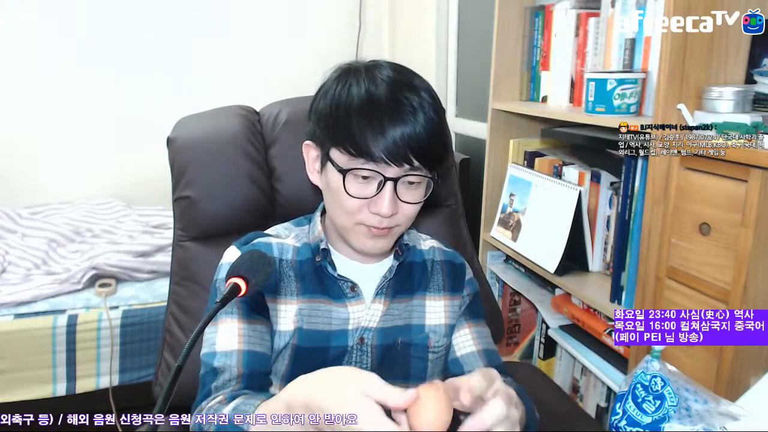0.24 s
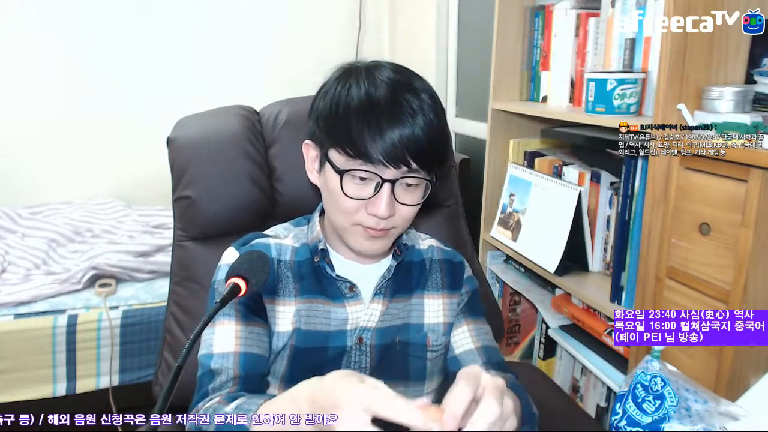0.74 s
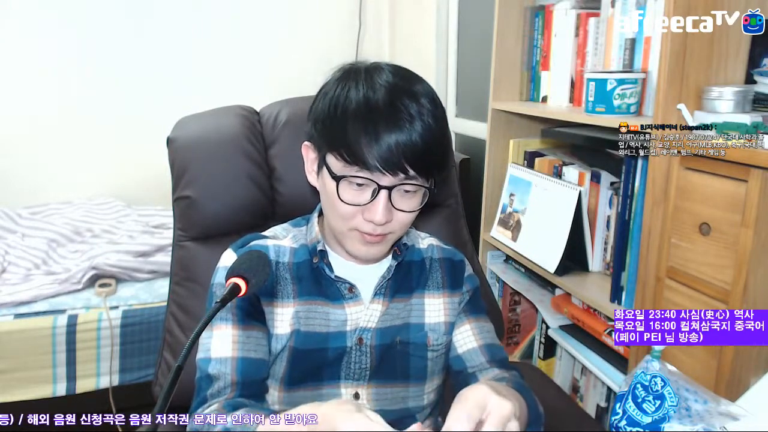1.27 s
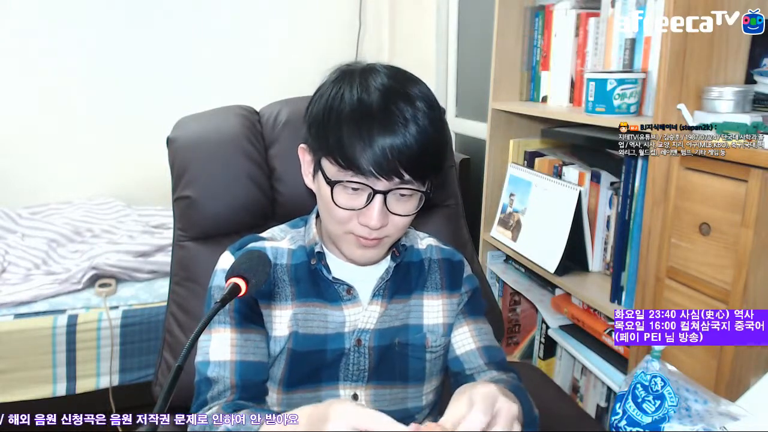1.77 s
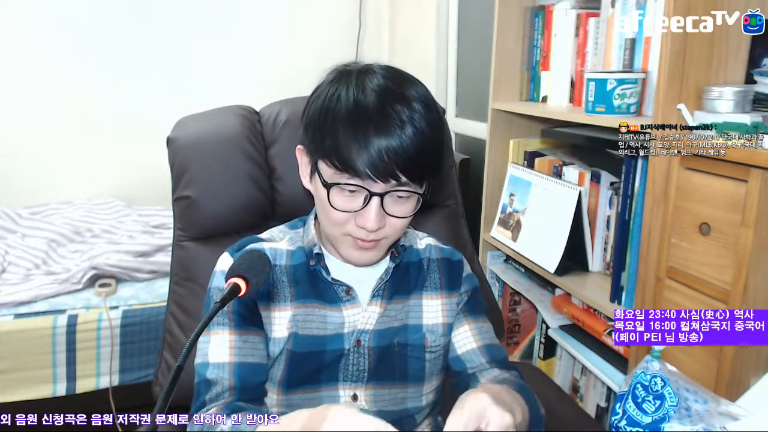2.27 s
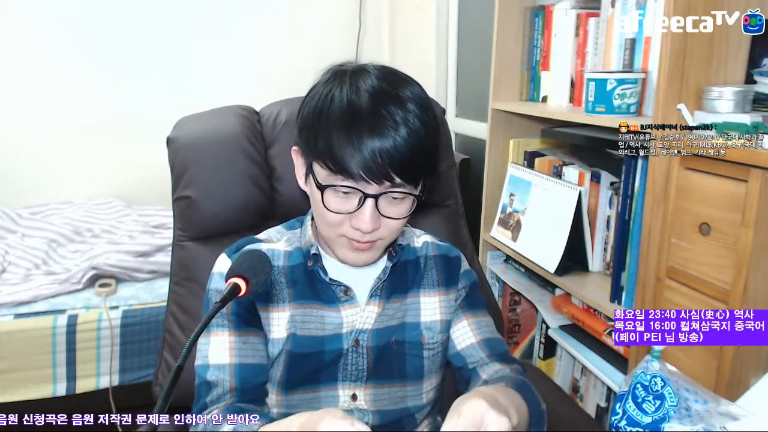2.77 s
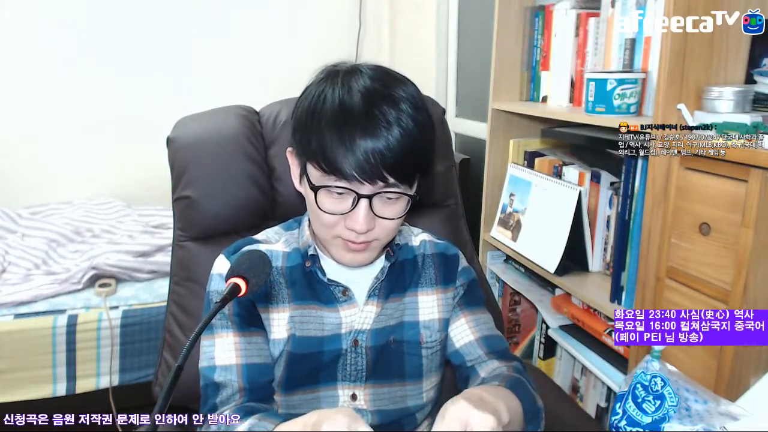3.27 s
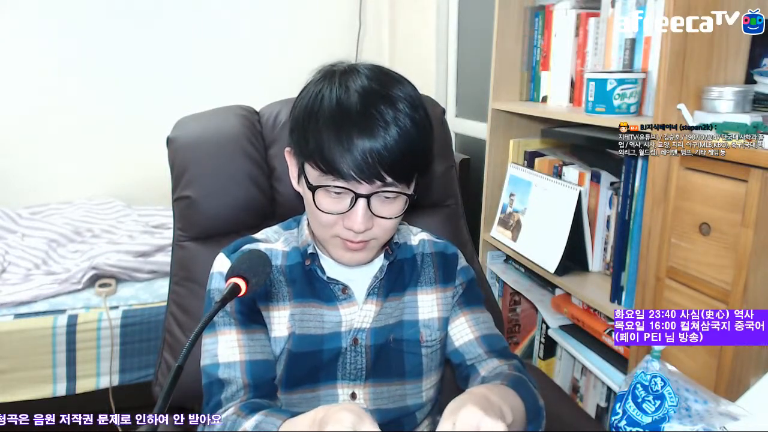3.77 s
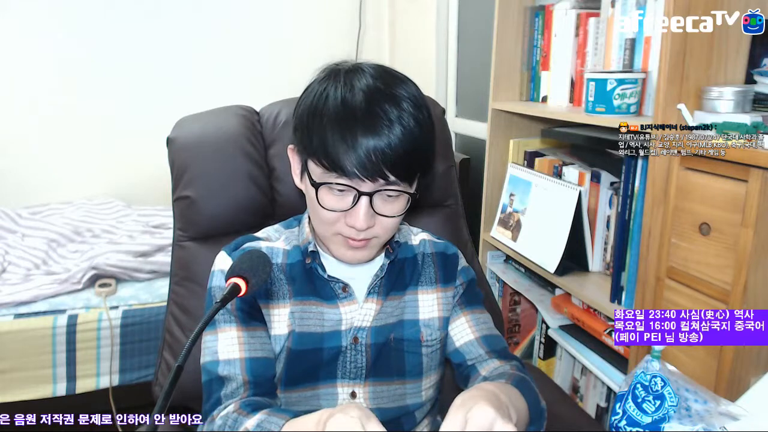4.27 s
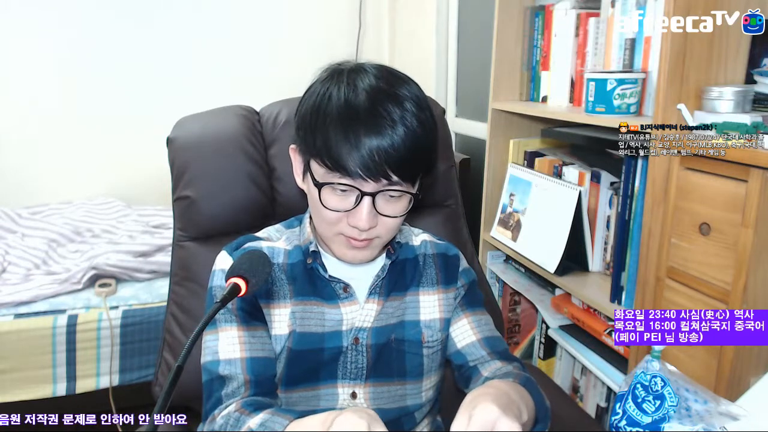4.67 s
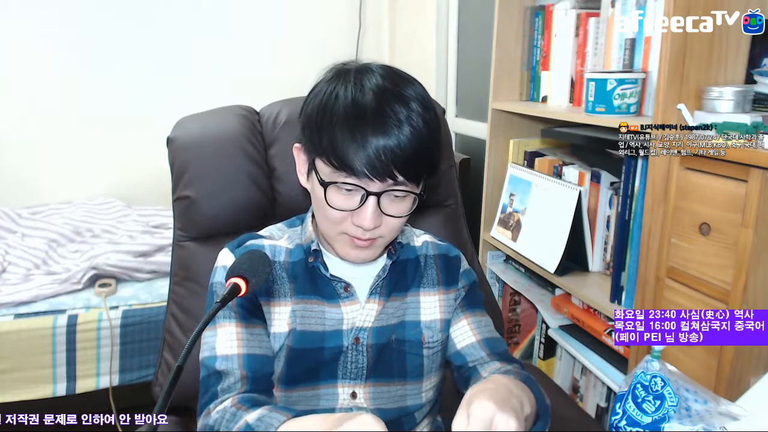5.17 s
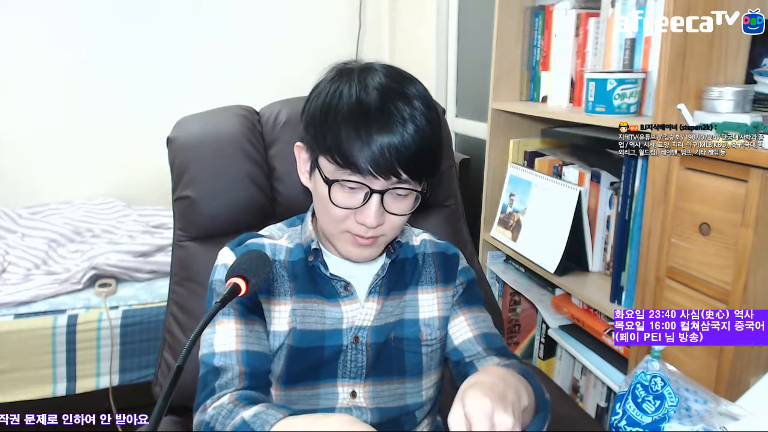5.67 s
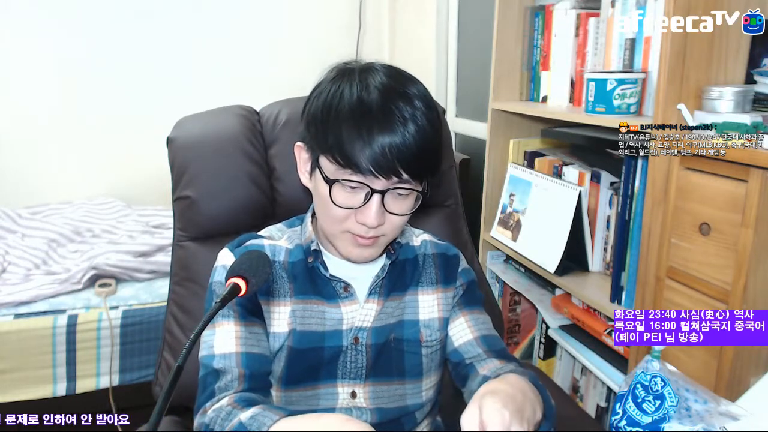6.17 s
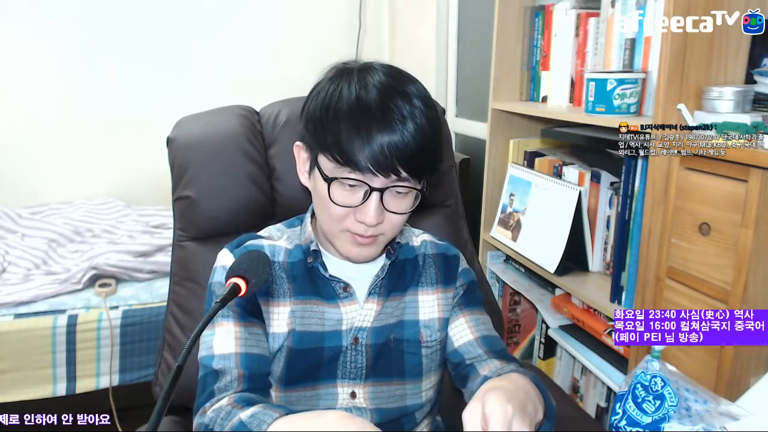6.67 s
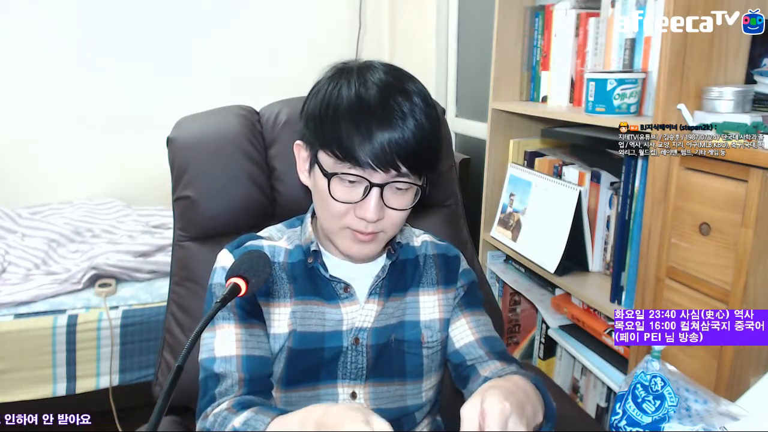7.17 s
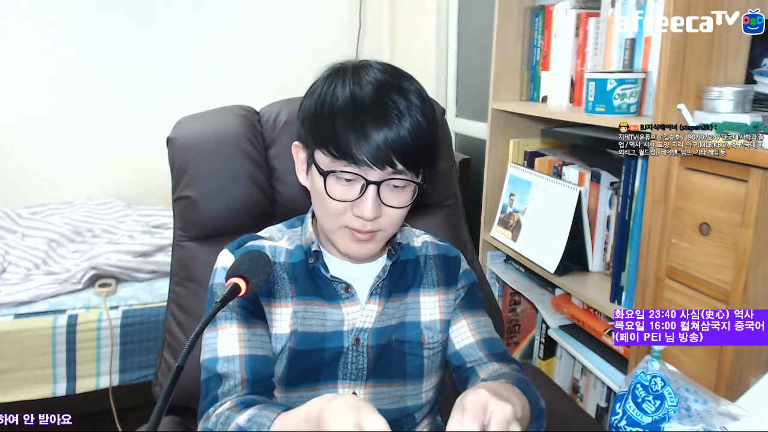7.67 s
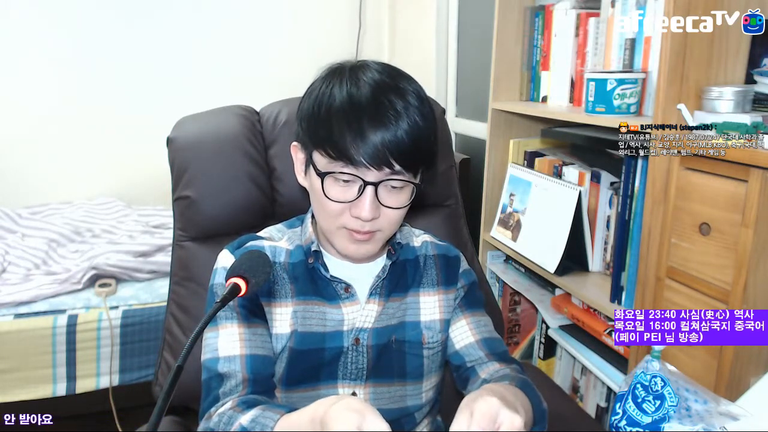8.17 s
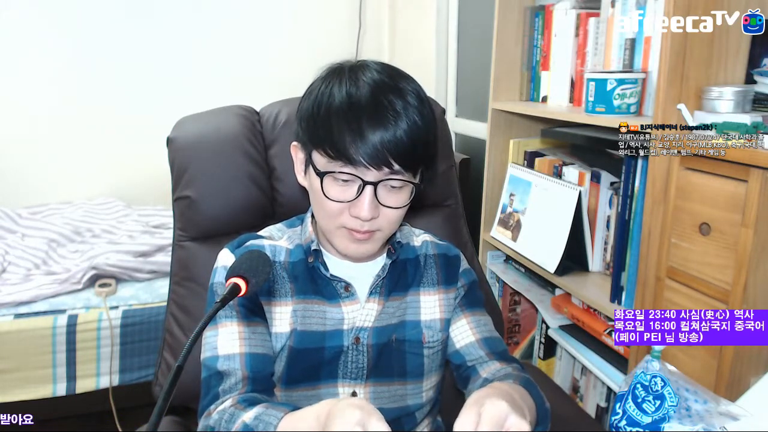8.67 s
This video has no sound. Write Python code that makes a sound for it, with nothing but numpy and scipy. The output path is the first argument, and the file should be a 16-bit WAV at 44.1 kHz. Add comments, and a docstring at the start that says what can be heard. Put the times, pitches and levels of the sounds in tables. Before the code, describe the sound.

Quiet cracking and peeling of a cooked egg, with bits of shell clinking into a dish in a small, humming room.

```python
"""At a desk in a small, quiet room, a roasted egg is cracked and peeled by hand.
The shell crackles and snaps under the thumbs, coloured by the cupped hands, and once caves in with a pop.
Flakes tick and skitter into a ringing dish, and late on the membrane tears away in short, falling rips.
Mains hum, a computer fan, rumble, hiss and a thin electronic whine lie under it all."""
import sys
import numpy as np
from scipy import signal
from scipy.fft import rfft, irfft, next_fast_len
from scipy.io import wavfile
from scipy.ndimage import map_coordinates

SR = 44100
rng = np.random.default_rng(int(sys.argv[2]) if len(sys.argv) > 2 else 0)


def wav_out(sig):
    """Save sig, one row per channel (or a flat mono array), as 16-bit PCM at SR to the path in sys.argv[1]."""
    wavfile.write(sys.argv[1], SR, np.round(np.clip(np.atleast_2d(sig).T, -1, 1) * 32767).astype(np.int16))


N = 393372


def amp(db):
    """Decibels to gain."""
    return 10 ** (np.asarray(db) / 20)


def unit(x):
    """Scale to rms 1."""
    return x / np.sqrt(np.mean(x ** 2) + 1e-20)


def along(points, hz):
    """Read a curve of (frequency, value) points on a log frequency axis."""
    f, v = np.transpose(points)
    return np.interp(np.log(hz + 1), np.log(f), v)


def add(track, s, sound):
    """Mix a sound into a track at s seconds."""
    slot = track[max(0, round(s * SR)):][:len(sound)]
    slot += sound[:len(slot)]


def coloured(x, gain_db, size=1024):
    """Minimum-phase EQ with the curve gain_db(f): nothing rings ahead of an attack."""
    cepstrum = irfft(np.log(amp(gain_db(np.fft.rfftfreq(size, 1 / SR))) + 1e-6))
    cepstrum[1:size // 2] *= 2
    cepstrum[size // 2 + 1:] = 0
    impulse = irfft(np.exp(rfft(cepstrum)))
    return signal.fftconvolve(x, impulse)[:len(x)]


def noise(spectrum):
    """Steady noise of rms 1 with the given spectral shape."""
    size = next_fast_len(N)
    gain = amp(along(spectrum, np.fft.rfftfreq(size, 1 / SR)))
    return unit(irfft(rfft(rng.standard_normal(size)) * gain, size)[:N])


def wobble(rate):
    """A smooth random curve, rate knots a second."""
    knots = rng.standard_normal(int(N * rate / SR) + 4)
    return map_coordinates(knots, [np.arange(N) * rate / SR])


def background(mains_hz=60, waver_db=0.2, drift_rad=0.15, rumble_db=-56, air_db=-64, hiss_db=-67.5):
    """The bed: slightly unsteady mains hum and computer fan tones over room rumble, air and hiss."""
    # mains hum: harmonic number, rms level/dB
    harmonics = [(1, -30), (2, -64), (3, -79), (4, -79.5), (5, -74.5), (7, -71), (8, -82.5), (9, -79.5),
                 (11, -72), (13, -77), (15, -82.5)]
    # tones of the computer: f/Hz, rms level/dB
    fan_tones = [(368, -66), (3848, -82), (11434, -94)]
    # spectra of the low, middle and high room noise: f/Hz, relative level/dB
    rumble = [(15, -13), (30, -8.5), (50, 2.5), (85, -0.5), (110, -11), (160, -50), (300, -42.5)]
    air = [(80, 11.5), (150, 5), (350, 3.5), (600, 1), (900, -0.5), (1300, -4), (2500, -18.5)]
    hiss = [(560, -37), (950, -4.5), (2310, -3), (3600, -7.5), (4000, -5), (4190, -7.5), (9060, -12),
            (9830, -11), (15500, -15)]
    t = np.arange(N) / SR
    tone = lambda hz, db, phase: np.sqrt(2) * amp(db) * np.sin(2 * np.pi * (hz * t + rng.random()) + phase)
    hum = amp(waver_db * wobble(11)) * sum(tone(k * mains_hz, db, 0) for k, db in harmonics)
    lowest_hz = fan_tones[0][0]
    fan = sum(tone(hz, db, drift_rad * np.sqrt(hz / lowest_hz) * wobble(3.1)) for hz, db in fan_tones)
    wash = amp(rumble_db) * noise(rumble) + amp(air_db) * noise(air) + amp(hiss_db) * noise(hiss)
    return hum + fan + wash


def whine(hz=10010, drift_rad=1.8):
    """A thin, wavering electronic tone that swells and recedes."""
    # fader ride of the whine: t/s, rms level/dB
    ride = [(0, -92), (4.6, -85), (5.2, -81), (6.4, -86), (7.3, -85), (8, -88)]
    t = np.arange(N) / SR
    gain = np.sqrt(2) * amp(np.interp(t, *np.transpose(ride)))
    return gain * np.sin(2 * np.pi * hz * t + drift_rad * wobble(40))


def looseness(s):
    """Firm shell breaks in broad, splintery cracks; loose flakes click more narrowly."""
    # state of the shell: t/s, nominal bandwidth/octaves, splintering t60/s
    loosening = [(1, .66, 0.015), (2.1, 0.62, 0.014), (3.05, 0.93, 0.021), (3.85, .42, 0.018),
                 (4.8, 0.6, 0.021), (5.05, 0.3, 0.02), (7.5, 0.43, .008), (8.4, 0.39, 0.028)]
    times, octaves, t60 = np.transpose(loosening)
    return np.interp(s, times, octaves), np.interp(s, times, t60)


def grains(n, rate, scatter_db, rub):
    """n samples of tiny cracks of very uneven size, rate a second, over a soft rubbing."""
    sizes = amp(scatter_db * np.minimum(rng.exponential(size=n), 3))
    fires = rng.random(n) < rate / SR
    return fires * sizes * rng.choice([-1, 1], n) + rub * rng.standard_normal(n)


def shell(x, centre_hz, octaves, spread=1.09, shelf_hz=10400, shelf_db=-4, ripple_db=1.4, ripple_hz=600):
    """A patch of shell radiates one broad hump with small resonances, coloured by the cupped hands."""
    # resonances of the egg in the hands: f/Hz, width/Hz, boost/dB
    resonances = [(1420, 145, 9.5), (2070, 180, 8.5), (2820, 190, 4), (3820, 880, 2.5), (5600, 540, 1),
                  (9560, 2800, 4.5)]
    knots = rng.standard_normal(size=128)

    def gain_db(f):
        distance = np.log2((f + 1) / centre_hz) / (spread * octaves)
        hump = -5 / np.log(10) * distance ** 2 - 10 * np.log10(1 + f / centre_hz)
        hollow = sum(db * np.exp(-((f - hz) / width) ** 2) for hz, width, db in resonances)
        ripple = ripple_db * map_coordinates(knots, [f / ripple_hz], mode="mirror")
        soft_top = shelf_db / (1 + (shelf_hz / (f + 1)) ** 20)
        return hump + hollow + ripple + soft_top

    return coloured(x, gain_db)


def crackle(rate=380, crowding=0.78, trim_db=-2, broader=1.24):
    """Under each thumb stroke tiny cracks run through the shell while the membrane rubs."""
    # strokes that crush or peel: start t/s, end t/s, level/dB before trim, centre f/Hz
    strokes = [(0.273, 0.31, -66, 8100), (0.656, 0.692, -65, 7000), (1.113, 1.149, -58.5, 6300),
               (1.164, 1.179, -46.5, 6550), (1.192, 1.21, -42.5, 6200), (1.298, 1.436, -64, 4600),
               (1.769, 1.808, -64, 4500), (1.891, 1.927, -60.5, 9000), (1.98, 2.12, -68, 6000),
               (2.198, 2.306, -62, 7200), (2.413, 2.473, -65.5, 6000), (2.961, 3.085, -61.5, 5000),
               (3.107, 3.27, -61.5, 6000), (3.305, 3.392, -60.5, 5400), (3.412, 3.462, -60, 4700),
               (3.782, 3.852, -64, 6960), (3.915, 4.004, -63, 4860), (4.112, 4.193, -60, 5900),
               (4.191, 4.252, -57.5, 6500), (4.251, 4.334, -63, 5500), (4.594, 4.73, -64.5, 6500),
               (4.837, 4.94, -63.5, 6200), (4.984, 5.12, -64.5, 5500), (8.087, 8.144, -63, 6000),
               (8.243, 8.389, -57.5, 6800), (8.507, 8.55, -68, 7500), (8.557, 8.605, -60, 7170)]
    out = np.zeros(N)
    usual_db = np.median(np.transpose(strokes)[2])
    for start, end, db, centre_hz in strokes:
        n = max(round((end - start) * SR), SR // 200)
        density = rate * amp(crowding * (db - usual_db))  # a harder press sets off more cracks
        cracks = np.sqrt(np.hanning(n)) * grains(n, density, scatter_db=5, rub=0.12)
        stroke = shell(cracks, centre_hz, broader * looseness(start)[0])
        add(out, start, amp(db + trim_db) * unit(stroke))
    return out


def fracture(centre_hz, octaves, t60, spike=13, ring=0.39, ring_t60=0.014, size=1024):
    """A sharp break, a short rasp of splinters and the flake's own ring."""
    t = np.arange(size) / SR
    splinters = rng.standard_normal(size) * amp(5.2 * rng.standard_normal(size))
    rasp = 0.92 * splinters * amp(-60 * t / t60)
    rasp[0] = spike
    flake_hz = centre_hz * np.exp(0.14 * rng.standard_normal())
    flake = ring * np.sin(2 * np.pi * flake_hz * t) * amp(-60 * t / ring_t60)
    snap = shell(rasp + flake, centre_hz, octaves)
    return snap / np.sqrt(np.mean(snap[:150] ** 2))  # the attack has rms 1


def snaps(push_db=-70, push_follows=0.71, usual_db=-50, push_t60=0.098):
    """The shell snaps, and each break lets the fingers jolt dully against the egg."""
    # the clearest fractures: t/s, attack level/dB, centre f/Hz
    breaks = [(0.297, -57, 5600), (0.337, -60.5, 5300), (0.655, -59.5, 3420), (0.678, -61, 6000),
              (1.081, -56.5, 4000), (1.123, -51, 6600), (1.132, -45.5, 5400), (1.143, -56, 5200),
              (1.1713, -43.5, 6300), (1.201, -49.5, 6100), (1.205, -45, 3500), (1.2647, -51, 3600),
              (1.796, -52.5, 4150), (1.9162, -50.5, 7000), (1.9348, -47.5, 6300), (2.162, -49.5, 7100),
              (2.321, -56, 5200), (2.473, -54.5, 4650), (2.4809, -44.5, 8600), (2.485, -46, 8300),
              (2.883, -56, 4400), (2.982, -50, 4900), (2.987, -46.5, 4150), (3.005, -47.5, 6300),
              (3.037, -52, 4600), (3.0423, -44, 5900), (3.062, -50.5, 5500), (3.226, -51, 5170),
              (3.274, -46, 5450), (3.308, -46, 5100), (3.312, -43.5, 6500), (3.352, -54, 4700),
              (3.554, -55, 8000), (3.789, -48, 7350), (3.801, -50, 8500), (3.917, -50, 5700),
              (3.9496, -50.5, 5000), (4.038, -58.5, 3180), (4.082, -56, 3920), (4.131, -51.5, 5150),
              (4.156, -54, 5300), (4.202, -48.5, 6900), (4.211, -49, 5170), (4.65, -55, 6050),
              (4.6919, -49, 5630), (4.832, -49.5, 6700), (4.865, -51.5, 5670), (5.016, -57, 5040),
              (5.055, -57, 5100), (5.121, -59, 5500), (6.42, -55, 9300), (7.263, -56, 5500),
              (7.451, -53, 5000), (7.683, -49.5, 6100), (7.881, -57.5, 3930), (8.111, -55, 5270),
              (8.1477, -41, 5720), (8.202, -53, 4460), (8.235, -52.5, 4030), (8.2843, -49.5, 4700),
              (8.315, -49, 5150), (8.589, -52, 7340)]
    # spectrum of the fingers' push through the egg: f/Hz, relative level/dB
    flesh = [(70, -20), (160, 6), (260, -0.5), (500, -5.5), (800, -6), (1400, -23), (3000, -42.5)]
    out, t = np.zeros(N), np.arange(SR // 10) / SR
    for s, db, centre_hz in breaks:
        add(out, s, amp(db) * fracture(centre_hz, *looseness(s)))
        jolt = rng.standard_normal(len(t)) * amp(-60 * t / push_t60)
        push = coloured(jolt, lambda f: along(flesh, f))
        add(out, s, amp(push_db + push_follows * (db - usual_db)) * unit(push))
    return out


def pop(start_s=1.2025, length_s=0.006, db=-45):
    """The hardest squeeze caves the shell in over the air pocket with a hollow pop."""
    out, n = np.zeros(N), round(length_s * SR)
    burst = np.sqrt(np.hanning(n)) * rng.standard_normal(n)
    add(out, start_s, amp(db) * unit(shell(burst, centre_hz=1250, octaves=0.24)))
    return out


def dish(skitter=0.45, skitter_t60=0.058, pivot_hz=5500, tick_hz=8200, tick_db=-5.5, rattle_t60=0.15):
    """Each flake ticks on the dish and skitters briefly, feeding its ringing modes as it goes."""
    # landings: t/s, level/dB, brightness/(dB per octave), second mode's gain at that spot/dB
    drops = [(4.391, -44.5, 1.5, 6), (4.403, -51, 1, -6), (4.435, -54, 2, 1), (4.455, -54, -0.5, 3),
             (5.268, -48.5, 5, 6), (5.286, -44, -4, 6), (5.325, -52.5, 5, -1), (5.395, -53, -2, 2),
             (5.417, -56, 5, -2.5), (5.964, -55.5, 3, 6), (6.011, -56, 10, -1), (8.857, -37.5, 10, -7),
             (8.872, -38, -4, -1), (8.9135, -37.5, -4, -18)]
    # modes of the dish: f/Hz, relative level/dB, t60/s
    modes = [(2848, 0, .075), (4156, 1, .1), (5927, -4, .065), (7289, -10, .07), (7740, -8, .06),
             (7930, -5, .065), (9663, -5, .07), (10600, -12, .07), (12140, -16, .06), (13400, -17, .06)]
    out, t = np.zeros(N), np.arange(SR // 4) / SR
    hz, mode_db, t60 = np.transpose(modes)[:, :, None]
    free = amp(-60 * t / t60) * np.sin(2 * np.pi * hz * t)
    for s, db, bright, second_db in drops:
        contact = skitter * rng.standard_normal(len(t)) * amp(-60 * t / skitter_t60)
        contact[0] = 1  # the first hit
        fed = signal.fftconvolve(free, contact[None], axes=1)[:, :len(t)]
        fed *= (free.std(1) / fed.std(1))[:, None]  # skittering only spreads each mode's energy in time
        strength = amp(mode_db + bright * np.log2(hz / pivot_hz))
        strength[1] *= amp(second_db)
        ring = (strength * fed).sum(0) / np.linalg.norm(strength)
        rattle = shell(rng.standard_normal(len(t)) * amp(-60 * t / rattle_t60), tick_hz, octaves=1)
        tick = fracture(tick_hz, octaves=0.27, t60=0.0316)
        add(out, s, amp(db) * (ring + amp(-11) * rattle))
        add(out, s, amp(db + tick_db + 0.44 * bright) * tick)  # a harder, brighter landing ticks more
    return out


def membrane(sag_hz_per_s=12000, width_hz=1150, attack_s=0.001, trim_db=-1.5):
    """Tiny slips ring each tearing strip of membrane; the freed strip lengthens, so its pitch falls."""
    # tears: start t/s, length/s, level/dB before trim, starting f/Hz
    tears = [(7.879, .024, -53, 3800), (8.143, 0.038, -54, 3950), (8.23, .11, -56, 3950)]
    out = np.zeros(N)
    pole = np.exp(-np.pi * width_hz / SR)
    for start, length, db, hz in tears:
        t = np.arange(round(length * SR)) / SR
        slips = grains(len(t), rate=600, scatter_db=4, rub=0.069)
        glide = np.exp(2j * np.pi * np.cumsum(hz - sag_hz_per_s * t) / SR)
        strip = (glide * signal.lfilter([1], np.poly([pole, pole]), slips / glide)).imag  # swept band-pass
        pull = (1 - np.exp(-t / attack_s)) * np.sqrt(1 - t / length)
        add(out, start, amp(db + trim_db) * unit(strip * pull))
    return out


def room(x, predelay_s=0.003):
    """The small room's reverb, each frequency dying at its own speed."""
    # decay of the room: f/Hz, t60/s
    decay = [(200, 0.15), (2000, 0.26), (6000, 0.22), (14000, 0.142)]
    hz, t, bands = signal.stft(rng.standard_normal(SR // 3), SR, nperseg=256)
    tail = signal.istft(bands * amp(-60 * t / along(decay, hz)[:, None]), SR, nperseg=256)[1]
    impulse = np.pad(tail / np.linalg.norm(tail), (round(predelay_s * SR), 0))
    return signal.fftconvolve(x, impulse)[:N]


def scene(egg_send_db=-7.5, pop_send_db=-13, dish_send_db=-10):
    """Egg and dish at arm's length, with a little reverb, over the bed; mono."""
    egg = snaps() + crackle() + membrane()
    cave_in, clinks = pop(), dish()
    reverb = room(amp(egg_send_db) * egg + amp(pop_send_db) * cave_in + amp(dish_send_db) * clinks)
    return (egg + cave_in + clinks + reverb + background() + whine())[None]


def record(dry):
    """A steep low-pass takes off the very top of the treble."""
    top_hz = 15900
    low_pass = signal.firwin(255, top_hz, fs=SR, window="blackmanharris")
    return signal.fftconvolve(dry, low_pass[None], "same", axes=1)


dry = scene()
out = record(dry)
wav_out(out)
```